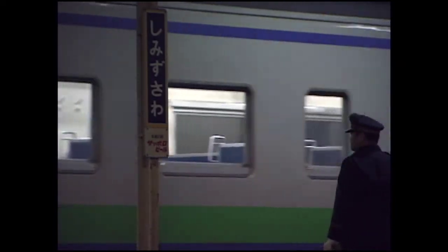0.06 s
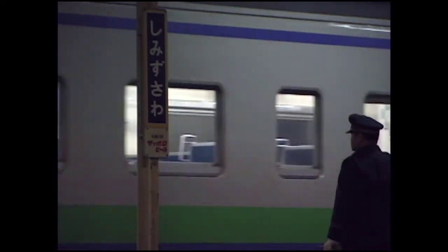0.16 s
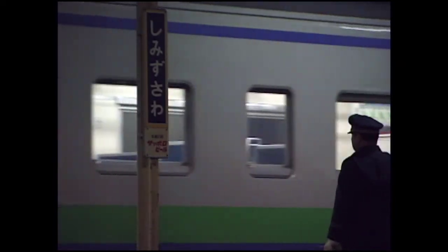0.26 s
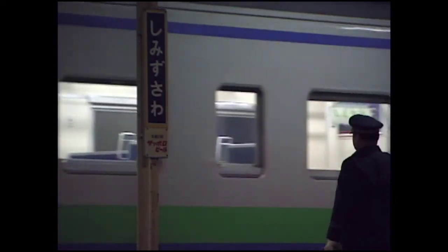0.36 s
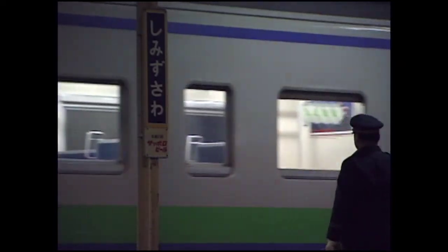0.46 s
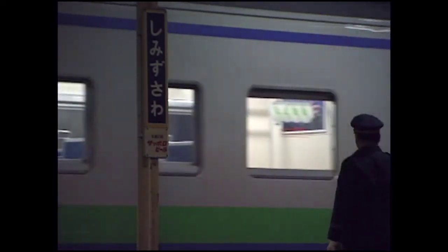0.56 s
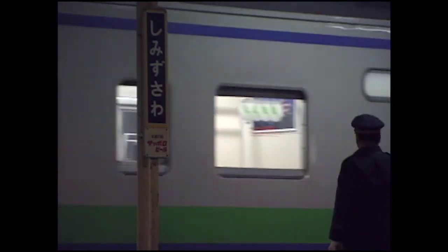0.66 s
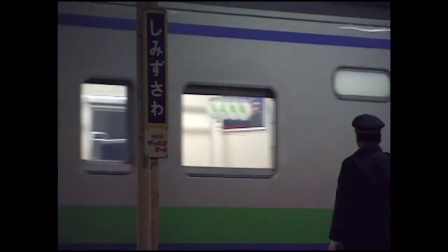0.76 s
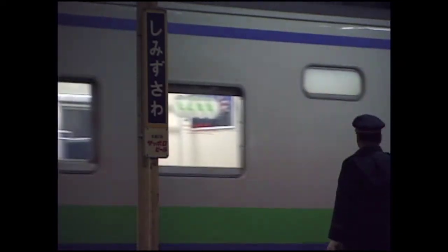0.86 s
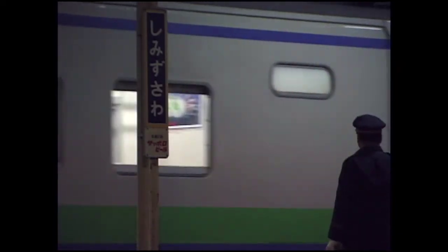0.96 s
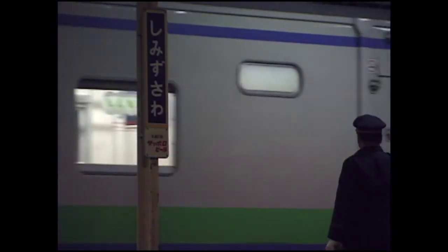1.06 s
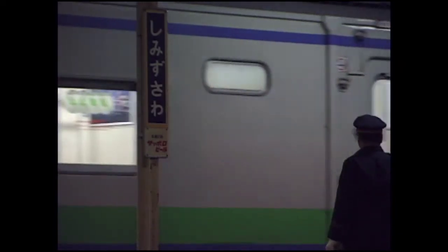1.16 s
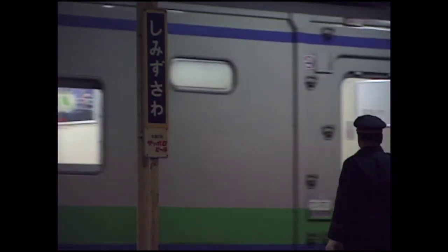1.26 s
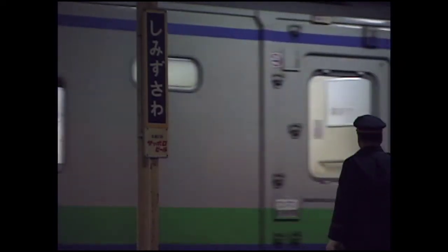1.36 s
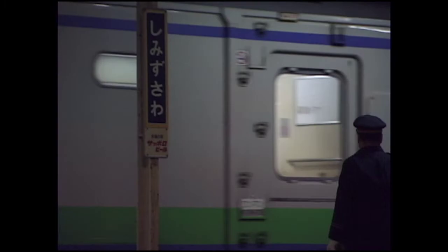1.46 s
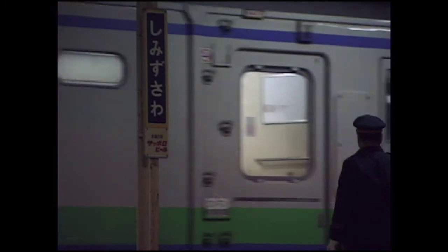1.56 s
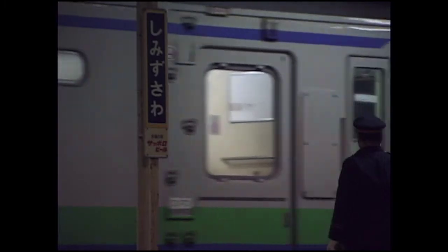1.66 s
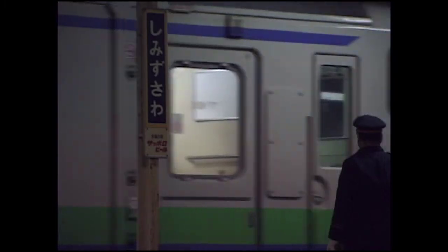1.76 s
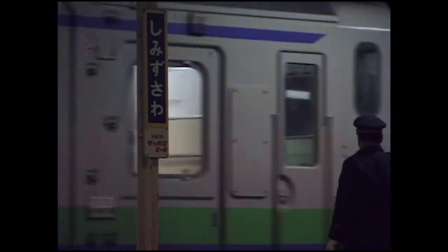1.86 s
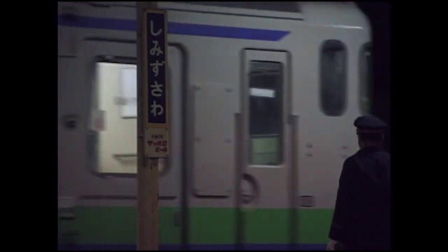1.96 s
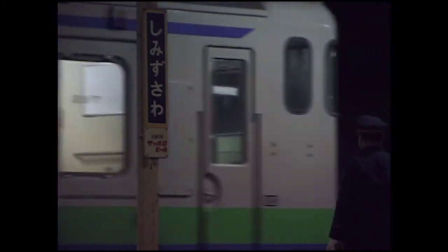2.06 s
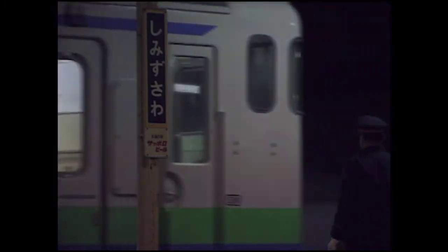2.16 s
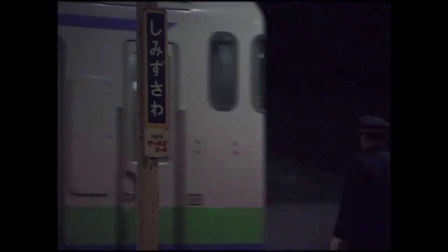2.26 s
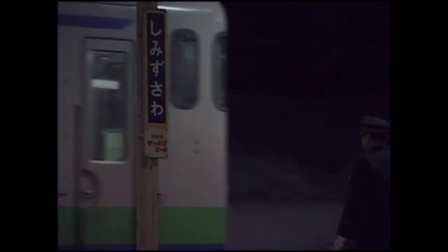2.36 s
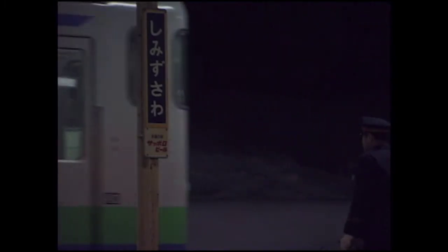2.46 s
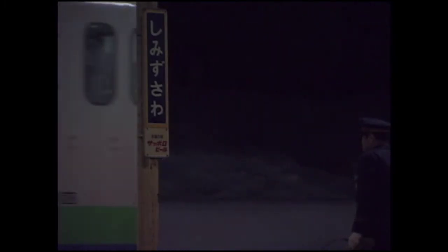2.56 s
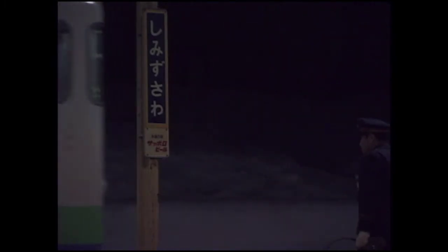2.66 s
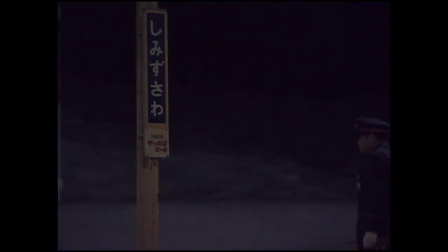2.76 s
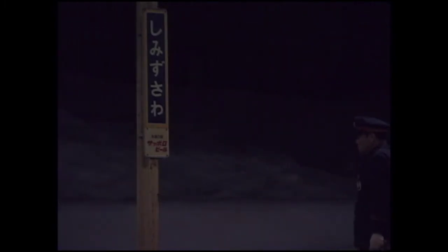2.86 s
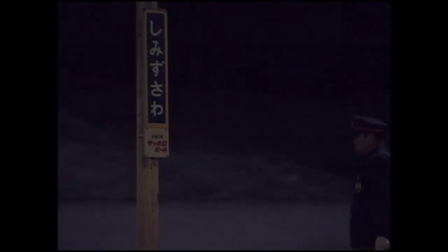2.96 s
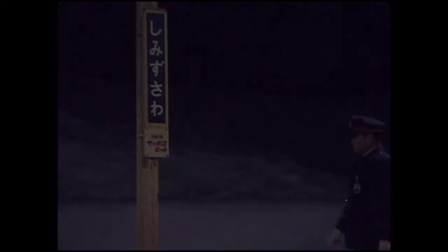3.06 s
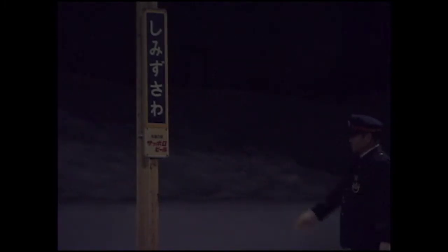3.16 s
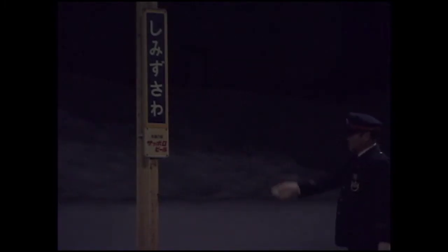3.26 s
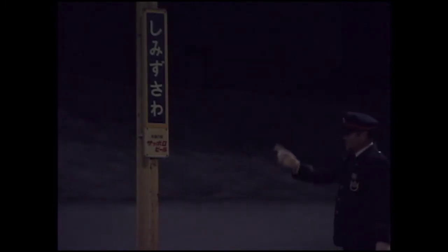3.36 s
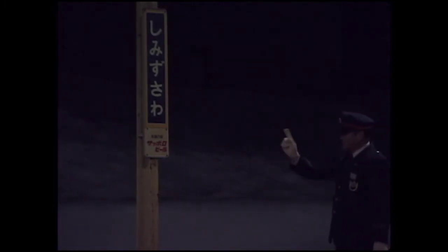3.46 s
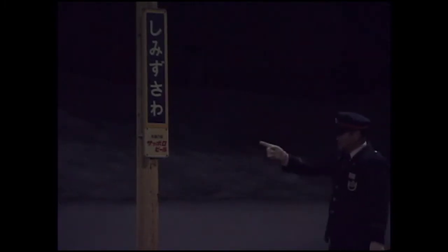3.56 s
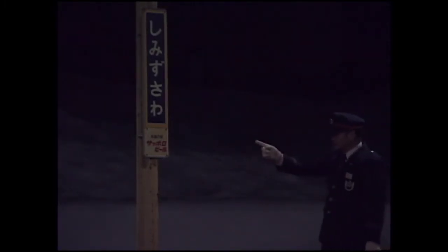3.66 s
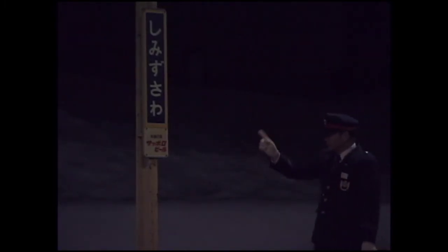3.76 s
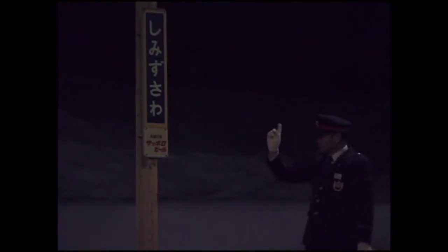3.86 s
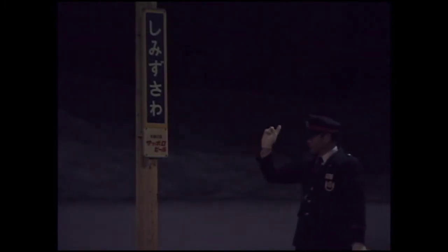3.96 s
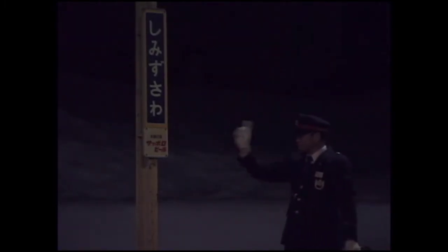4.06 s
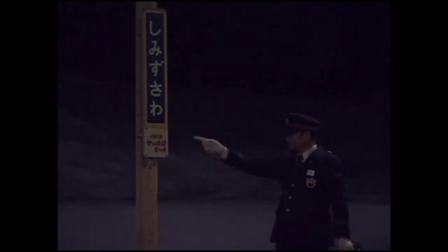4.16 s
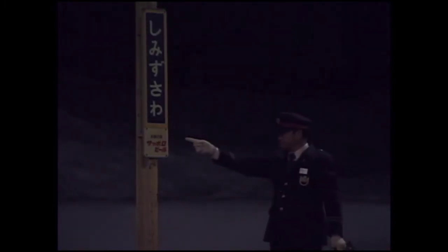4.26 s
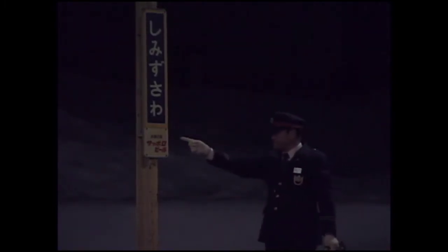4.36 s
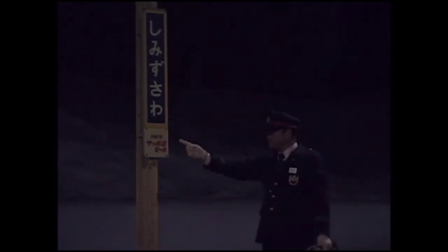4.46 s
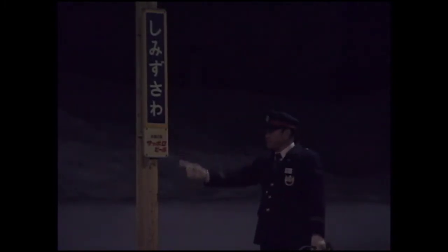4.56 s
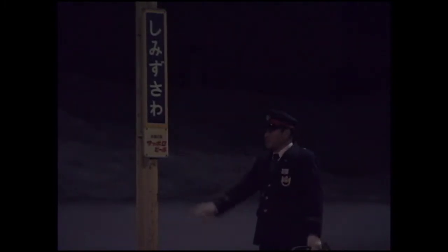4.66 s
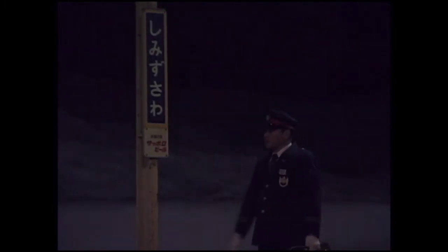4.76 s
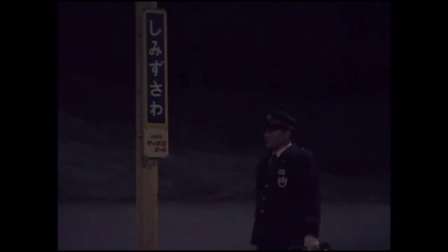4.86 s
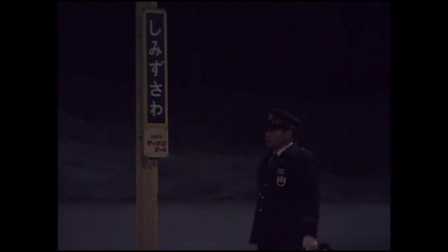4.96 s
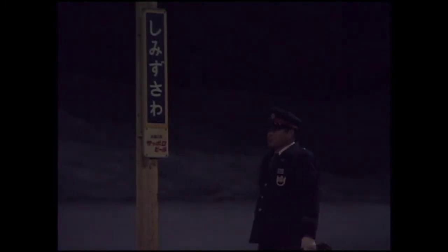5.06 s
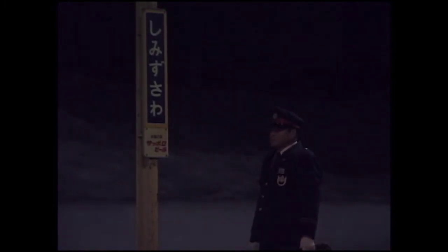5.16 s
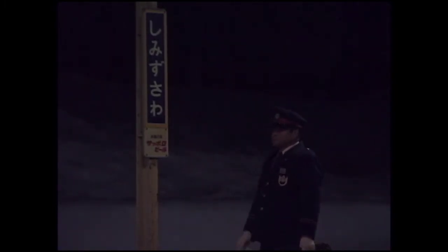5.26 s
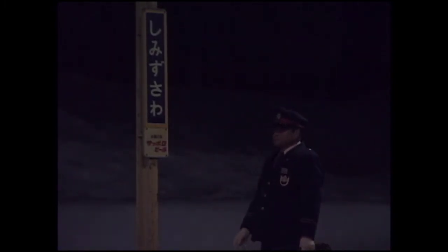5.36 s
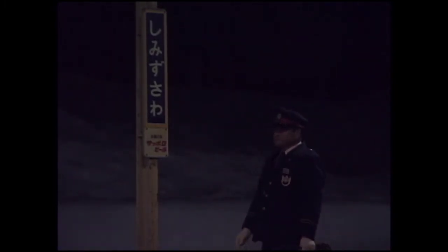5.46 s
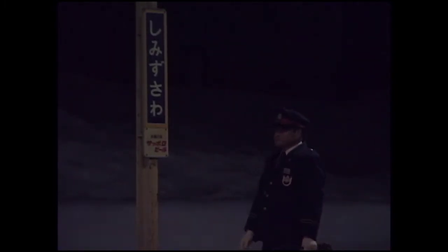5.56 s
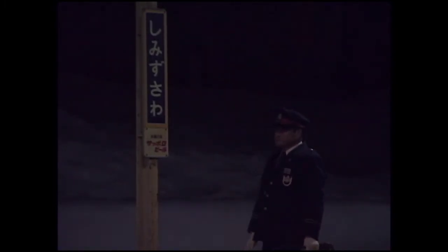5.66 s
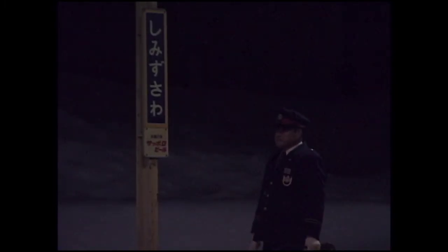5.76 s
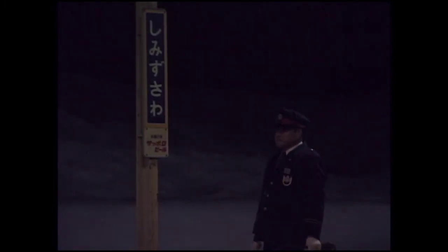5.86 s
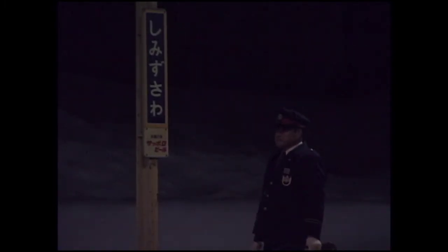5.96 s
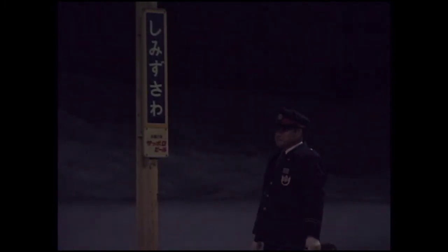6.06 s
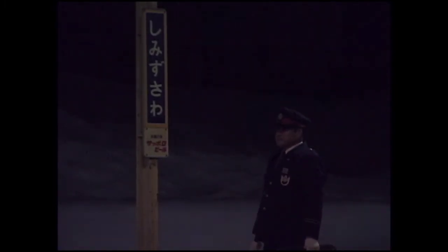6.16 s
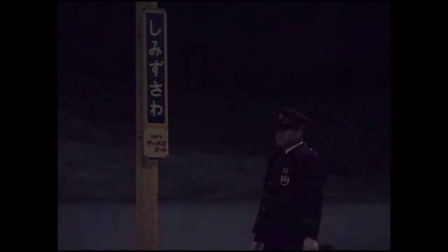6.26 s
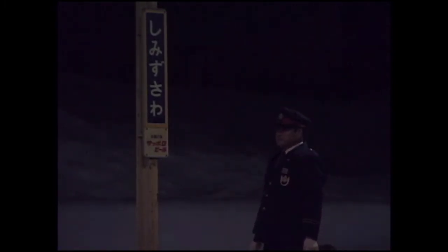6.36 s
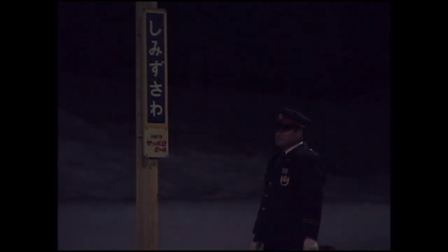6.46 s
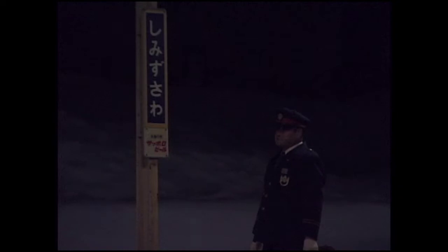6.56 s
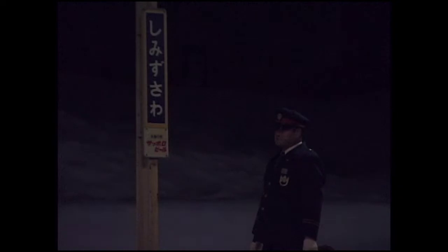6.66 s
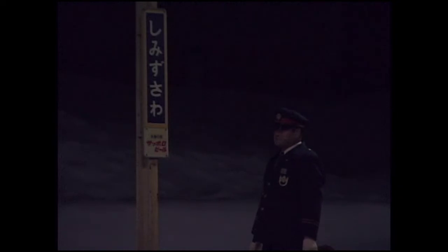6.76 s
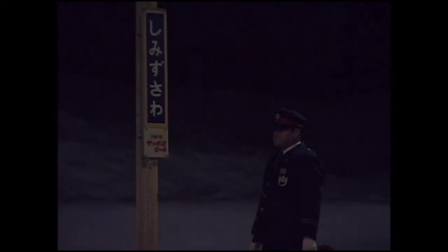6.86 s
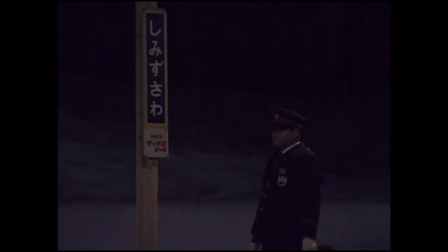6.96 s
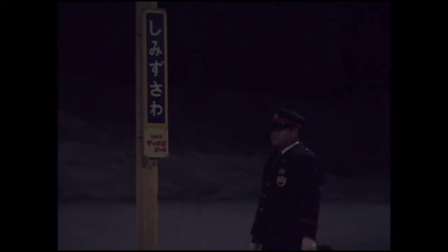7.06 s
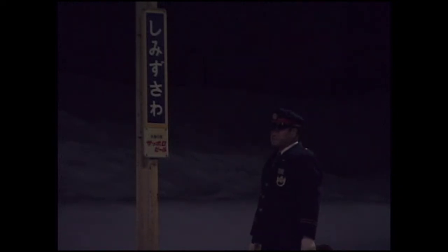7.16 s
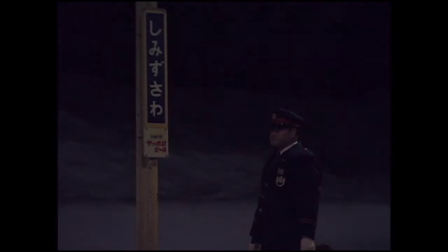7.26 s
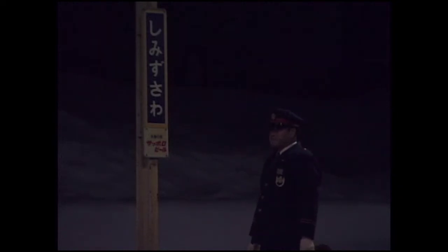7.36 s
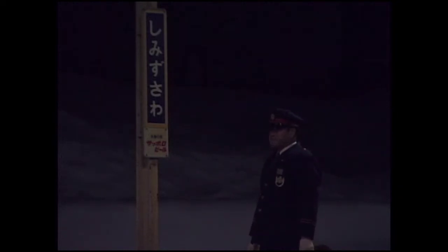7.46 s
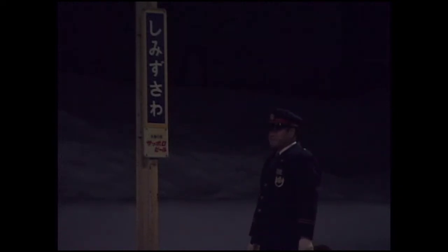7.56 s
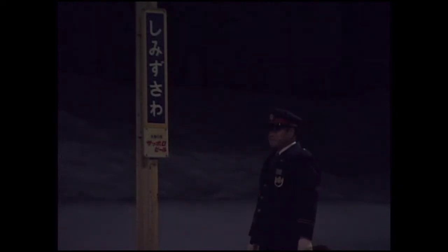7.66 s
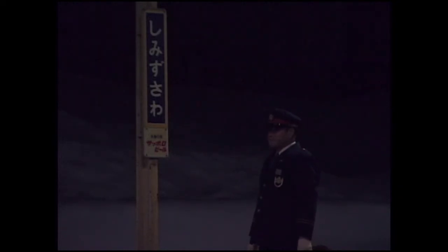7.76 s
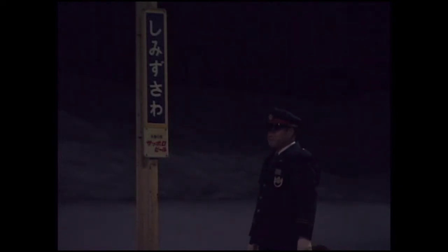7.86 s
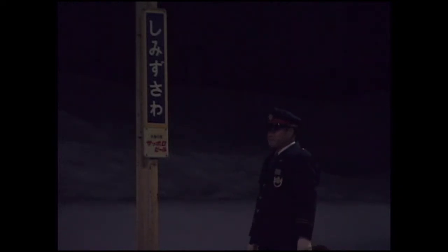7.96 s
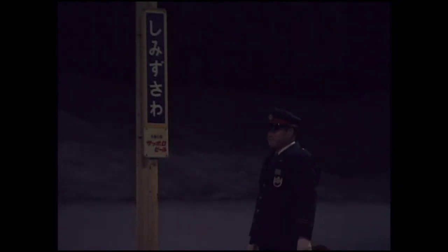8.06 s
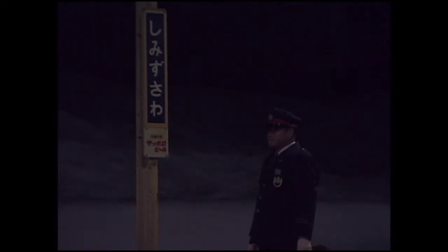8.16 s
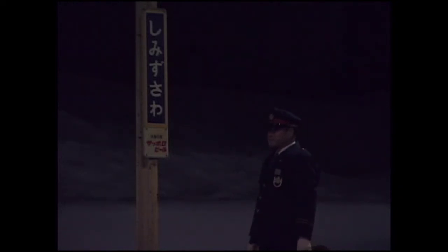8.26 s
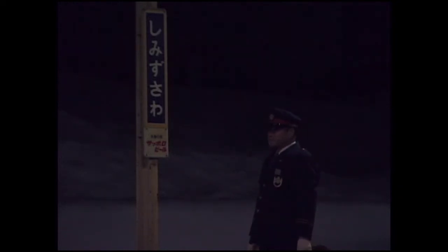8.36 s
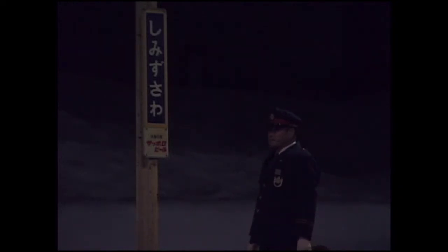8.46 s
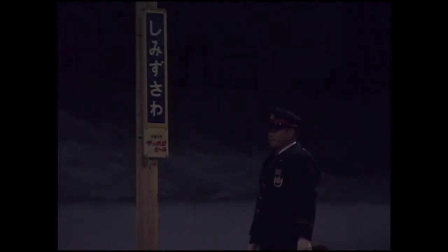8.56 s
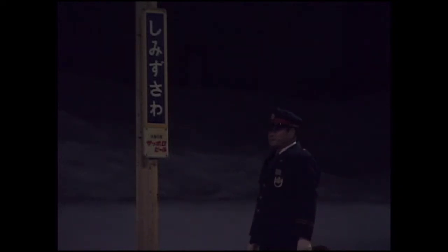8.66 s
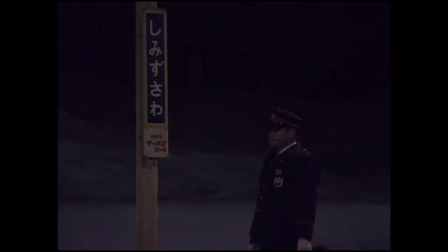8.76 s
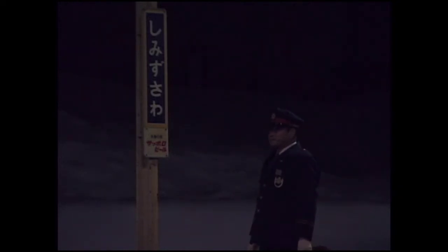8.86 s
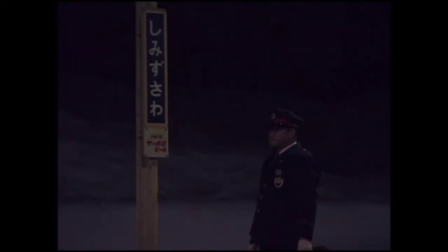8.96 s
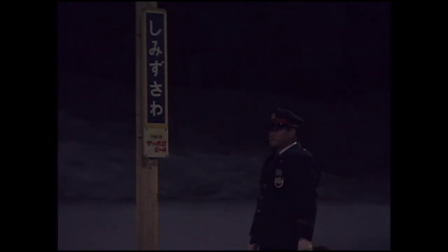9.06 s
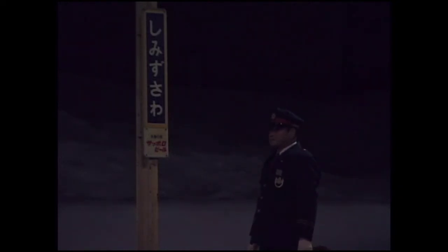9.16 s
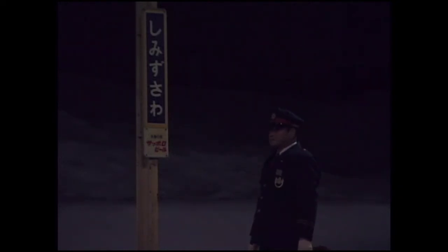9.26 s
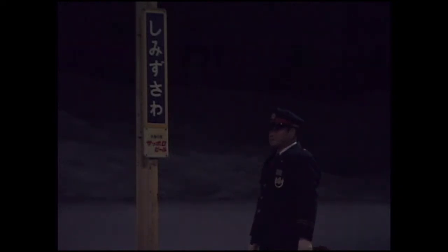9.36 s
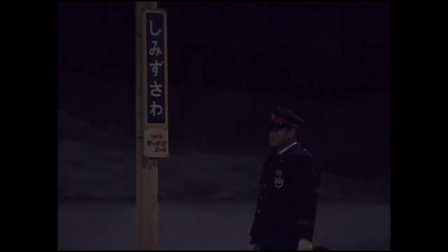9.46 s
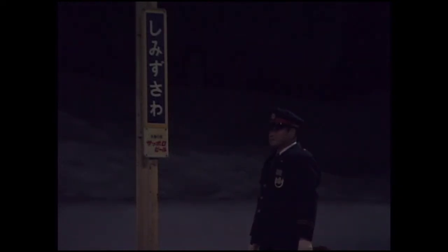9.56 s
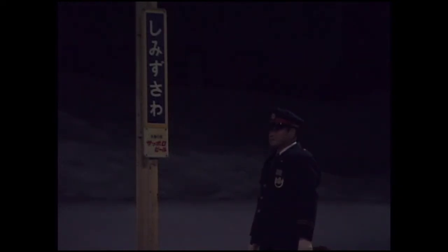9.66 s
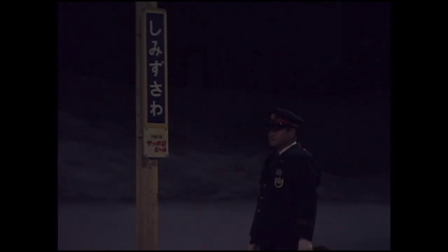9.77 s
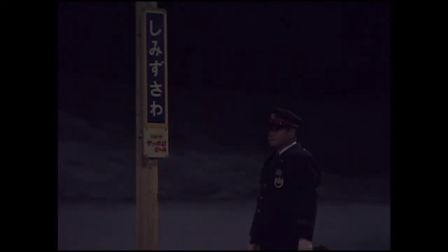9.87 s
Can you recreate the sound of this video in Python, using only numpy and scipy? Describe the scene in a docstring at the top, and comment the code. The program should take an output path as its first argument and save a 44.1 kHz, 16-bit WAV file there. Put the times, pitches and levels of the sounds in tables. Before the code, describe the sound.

From 0 s a diesel railcar is already loud and close to a stereo microphone on an open night platform, nearly centred. Its mid-pitched roar is a rattling, tightly repeating texture with about 78 firing pulses a second, shifting tones, deep exhaust and hard injector clatter. A gear whine rises slightly from about 517 to 537 Hz. Gritty wheel squeaks chirp around 3.4 to 4.5 kHz between 1 and 5 s, and airy hiss swells near 3.4 s. The sound drifts left and the engine pitch sags slowly. From 5 to 7 s it drops rapidly, brightness going first. Distant steel wheels knock over a joint at about 7.3, 7.65, 7.9 and 8.25 s, with short metallic rings. Fainter, duller thumps follow from 8.7 to 9.9 s, with a faint far drone, thin wavering rail whistles near 3.4 kHz, and soft microphone hiss over still night air.

```python
"""Diesel railcar leaving at night

From a platform, a railcar passes close to a two-port microphone and fades away to the left.
Its six-cylinder engine is a noise pattern repeated nearly alike every cycle and pulsed by the firings,
with harmonics of the cycle, a gear whine, squeaks and shaped hiss. Further off, noise bursts ring track
modes as two bogies knock over a rail joint and fainter thumps follow; wavering sines are the thin rails."""
import sys
import numpy as np
from scipy import signal
from scipy.fft import rfft, irfft
from scipy.io import wavfile
from scipy.ndimage import uniform_filter1d, map_coordinates

SR = 44100
rng = np.random.default_rng(int(sys.argv[2]) if len(sys.argv) > 2 else 0)


def pcm_store(signal):
    """Save signal as 16-bit PCM."""
    levels = np.round(np.clip(np.atleast_2d(signal), -1, 1) * 32767)
    wavfile.write(sys.argv[1], SR, levels.astype(np.int16).T)


N = 437472
TIME, FREQ = np.arange(N) / SR, np.maximum(np.fft.rfftfreq(N, 1 / SR), 1)


def undb(db):
    """Decibels to gain."""
    return 10 ** (np.asarray(db) / 20)


def unit(x):
    """Scale to rms 1."""
    return x / np.sqrt(np.mean(x ** 2))


def curves(table):
    """One value per sample for each column of a table of times."""
    seconds, *columns = np.transpose(table)
    return [np.interp(TIME, seconds, column) for column in columns]


def colour(x, points):
    """Give x a spectrum of (Hz, dB) points that falls away beyond its ends; rms 1."""
    hz, db = np.transpose(points)
    skirts = np.minimum(1, np.minimum(FREQ / hz[0], hz[-1] / FREQ)) ** 4
    gain = undb(np.interp(np.log(FREQ), np.log(hz), db))
    return unit(irfft(rfft(x) * skirts * gain, N))


def resonance(f, hz, width):
    """Response of one mode, 1 at its centre."""
    return 1 / (1 + 1j * (f ** 2 - hz ** 2) / (f * width))


def ringing(push, hz, width):
    """A mode kept ringing by a push; rms 1."""
    return unit(irfft(rfft(push) * resonance(FREQ, hz, width) ** 2, N))


def walk(rate, size=8192):
    """Smooth chance that changes about rate times a second; spread 1."""
    f = np.fft.rfftfreq(size, TIME[-1] / size)
    slow = irfft(rfft(rng.standard_normal(size)) * np.exp(-(f / rate) ** 2), size)
    return unit(np.interp(TIME, np.linspace(0, TIME[-1], size), slow))


def swell(s, length_s):
    """A beamed sound rises and falls as its beam sweeps over the platform."""
    return np.exp(-.5 * ((TIME - s) / length_s) ** 2)


def beams(table, push):
    """Resonances set ringing by one push, each swelling in its own time."""
    return sum(undb(db) * swell(s, length_s) * ringing(push, hz, width)
               for hz, width, db, s, length_s in table)


def place(x, pan_db, lag_s):
    """A source on the left is louder there and reaches the right port later."""
    late = map_coordinates(x, [(TIME - lag_s) * SR], order=3, mode="nearest")
    return np.array([x * undb(pan_db / 2), late * undb(-pan_db / 2)])


# four-stroke cycles per second; the Doppler shift lowers them steadily once the engine has gone by
CYCLE_HZ, GONE_BY_S, SAG_HZ_PER_S = 12.972, 1.66, .072
CRANK_JITTER_S = 3.5e-5  # the crankshaft runs a little early and late, which blurs the high harmonics


def crankshaft():
    """Count of engine cycles so far: the running sum of the cycle rate, plus a slow jitter."""
    cycle_hz = CYCLE_HZ - SAG_HZ_PER_S * np.maximum(TIME - GONE_BY_S, 0)
    return np.cumsum(cycle_hz) / SR + CYCLE_HZ * CRANK_JITTER_S * walk(6)


def rattle(turns, change_s, count=3400):
    """A dense rattle that comes round once a cycle; it slowly changes as the car shows other sides."""
    out = np.zeros(N)
    for start in np.arange(0, TIME[-1] + change_s, change_s):
        near = abs(TIME - start) < change_s
        pattern = unit(irfft(np.exp(2j * np.pi * rng.random(count // 2 + 1)), count))
        weight = np.cos(np.pi / 2 * (TIME[near] - start) / change_s)
        position = turns[near] % 1 * count
        out[near] += weight * map_coordinates(pattern, [position], order=3, mode="grid-wrap")
    return out


def engine_drive(turns, share):
    """The rattle that repeats with the engine, mixed with fresh noise."""
    share = np.clip(share, 0, 1)
    return np.sqrt(share) * rattle(turns, 1.1) + np.sqrt(1 - share) * rng.standard_normal(N)


def firings(turns, depth_db, uneven_db, count=6):
    """Each cylinder gives a sharp swell that dies away; alternate cylinders differ in strength."""
    phase = turns * count % 1
    pulse = np.minimum(phase / 0.056, 1) * np.exp(-phase / 0.22)
    return unit(undb(depth_db * pulse + uneven_db * np.cos(np.pi * count * turns)))


def machinery(turns, share, spectrum, depth_db, uneven_db, flutter_db):
    """The engine's rattle, pulsed by the firings and coloured by the part that radiates it."""
    pulsed = engine_drive(turns, share) * firings(turns, depth_db, uneven_db)
    return colour(pulsed, spectrum) * undb(flutter_db * walk(14.0))


# Low note of the exhaust. Each row: pitch in Hz, level in dB within the spectrum.
EXHAUST_SPECTRUM = [(30, -47), (70, -43), (120, -29.5), (180, -17.5), (250, -7.5), (320, -7), (400, -1),
                    (520, 1.5), (620, 1.5), (800, -33)]
# the deep exhaust carries further: its level beside the car, and the dB it loses for each dB the block loses
EXHAUST_DB, EXHAUST_FADE = -34, 0.67


def exhaust(turns, share, block_db):
    """Deep noise pulsed gently by the firings; it fades less with distance than the block."""
    level_db = EXHAUST_DB + EXHAUST_FADE * (block_db - block_db.max())
    sound = machinery(turns, 0.69 * share, EXHAUST_SPECTRUM, depth_db=2.5, uneven_db=0.3, flutter_db=1.0)
    return sound * undb(level_db)


# Roar of the engine block. Each row: pitch in Hz, level in dB within the spectrum.
BLOCK_SPECTRUM = [(400, -42), (540, -10.5), (620, -2), (700, -3), (800, 2.5), (900, -1.5), (1020, -2),
                  (1200, -7.5), (1400, -8), (1800, -11.5)]


def engine_block(turns, share, block_db):
    """Middle-pitched roar, pulsed by the firings; it flutters more as the repeating share drops."""
    sound = machinery(turns, 0.55 * share, BLOCK_SPECTRUM, depth_db=4.0, uneven_db=0.5,
                      flutter_db=.7 * (1 - share))
    return sound * undb(block_db - 1.5)


# Engine tones that stand out from the roar. Each row: multiple of the cycle rate, level in dB before the
# fade with the block, second when loudest, half length in seconds.
ENGINE_ORDERS = [(14, -62, 1.5, 3), (16, -60, 3, 2.2), (18, -59, 4, .6), (20, -50, .6, .9),
                 (20, -56, 4, 1.1), (24, -54, .6, .8), (26, -53, 2.5, 1.3), (26, -55, 5.8, .8),
                 (30, -48, 1.1, .6), (31, -47.5, 3.2, 2.4), (33, -48, 2.7, .4), (39, -47, 1.5, 1.8),
                 (47, -43.5, 2.3, 1.6), (48, -42, 2, .4), (48, -43.5, 5.8, .5), (50, -38.5, 2.7, .65),
                 (53, -42, 4.8, 1.1), (55, -39.5, 2.5, .45), (55, -45, 5.8, .45), (57, -37, .9, .6),
                 (57, -44, 4.1, 1.1), (58, -41, .4, .5), (60, -39, 1.5, .55), (61, -40.5, .3, .55),
                 (61, -42.5, 3.1, .7), (62, -36.5, .5, .6), (62, -36, 3.3, .6), (62, -42, 4.8, .5),
                 (63, -39.5, .3, .4), (63, -38.5, 3.7, .5), (64, -42, 2.8, 1), (68, -41, .8, .8),
                 (69, -43.5, 3, 1.2), (72, -36.5, .25, .45), (75, -39.5, 1.3, .3), (76, -42, 4.8, .7),
                 (77, -41, 3.6, 1.1), (78, -41, .5, .55), (86, -42.5, 5.2, .5), (96, -40.5, 1.3, .5),
                 (108, -42, 1.4, .5), (129, -42, 3.5, .5), (133, -40, 1.6, 1.5), (133, -41.5, 4.9, .5),
                 (135, -39.5, .2, .45), (137, -39, .8, .6), (137, -44, 4, .8), (139, -38, 1, .55),
                 (139, -41, 4.95, .45), (145, -41, 1, .5)]
TONES_FADE_DB = -32  # the tones sink with the block once it is below this level


def engine_tones(turns, block_db, scatter_per_order=.007, most_scatter=.42):
    """Harmonics of the cycle, each beamed in its own time; shifting reflections make higher ones waver."""
    tones = 0
    for order, db, s, length_s in ENGINE_ORDERS:
        phase = 2 * np.pi * (order * turns + rng.random())
        scatter = min(scatter_per_order * order, most_scatter)
        wavering = np.sin(phase + scatter * walk(3)) * (1 + scatter * walk(3))
        tone = wavering * np.sqrt(2 / (1 + scatter ** 2))
        tones = tones + undb(db) * swell(s, length_s) * tone
    return tones * undb(np.minimum(block_db - TONES_FADE_DB, 0))


# The final drive whines upward as the car gathers speed, until the Doppler shift holds it.
# Each row: time in seconds, pitch in Hz, level in dB.
GEAR_PATH = [(0, 517, -43), (.6, 525, -43), (1.4, 532, -46), (2.4, 537, -46), (4, 537, -42.5),
             (4.9, 536, -42), (5.7, 534, -50), (7, 534, -66), (8, 534, -80)]


def gear_whine(waver_hz=1.2, flutter_db=2.2):
    """Meshing teeth sing one wavering note that follows the road speed."""
    hz, db = curves(GEAR_PATH)
    phase = 2 * np.pi * np.cumsum(hz + waver_hz * walk(8)) / SR
    return undb(db + flutter_db * walk(5)) * np.sqrt(2) * np.sin(phase)


# Body panels that drone as the car goes by the platform. Each row: pitch in Hz, width in Hz, level in dB,
# second when loudest, half length in seconds.
PANEL_MODES = [(248, 110, -62.5, 6.1, 0.98), (384, 50, -43, 3.97, 0.52), (636, 180, -32, 2.5, 0.33),
               (564, 140, -36, 3.9, .4), (974, 210, -33.5, 4.87, 0.77), (1800, 46, -35, 0.15, 0.62),
               (1753, 63, -40, 3.1, 0.99), (1723, 75, -34, 4.96, 0.48)]


def body_panels(turns, share):
    """Panel resonances driven mostly by the engine's rattle, each swelling in its own time."""
    return beams(PANEL_MODES, engine_drive(turns, .85 * share))


# Clatter of the injectors. Each row: pitch in Hz, level in dB within the spectrum.
CLATTER_SPECTRUM = [(1000, -2.5), (1350, -3), (1550, -1.5), (1770, 2), (2000, -2), (2300, -6.5),
                    (2900, -11.5), (3150, -12), (3420, -13), (3750, -19.5), (4500, -61)]


def injector_clatter(turns, share):
    """Hard upper-middle noise, pulsed most deeply while the engine's repeating share is high."""
    return machinery(turns, 0.57 * share, CLATTER_SPECTRUM, depth_db=6.1 * share, uneven_db=-0.36,
                     flutter_db=0.55)


# Bright ticks of the injectors. Each row: pitch in Hz, level in dB within the spectrum.
TICK_SPECTRUM = [(2500, -2.5), (3000, -3.5), (3400, 4.5), (3750, 1), (4250, 0), (4750, -9), (5600, -14.5),
                 (8000, -54)]


def injector_ticks(turns, share):
    """Brighter pulsed noise under the clatter, most of it fresh at each cycle."""
    return undb(-11.5) * machinery(turns, 0.11 * share, TICK_SPECTRUM, depth_db=7.4 * share,
                                   uneven_db=0.9, flutter_db=1.3)


# Wheel modes that grit sets chirping. Each row: pitch in Hz, width in Hz, level in dB against the clatter
# before the flutter and the fade with the engine's share.
WHEEL_MODES = [(3430, 130, -19), (4230, 420, -20), (6450, 560, -39)]
# The clearest stick-slip squeaks from the wheels. Each row: start in seconds, pitch in Hz, level in dB
# against the clatter before that fade.
CLEAR_SQUEAKS = [(1.190, 4050, -11), (1.663, 3350, -6), (1.819, 3420, -5), (2.695, 3570, -11),
                 (3.144, 4520, -14), (3.349, 3445, -5), (4.054, 4300, -8), (4.536, 3430, -2),
                 (4.616, 3450, -4), (4.928, 3500, -4), (5.127, 4250, -8)]
# fainter squeaks: how many a second, level against the wheel mode set off, stray from its pitch (share)
SQUEAKS_PER_S, SQUEAK_DB, SQUEAK_DETUNE = 22, 3, .06


def squeaks(rise_s=0.0066, width_hz=300, size=4400):
    """Stick-slip chirps, each a rough ring that grows and dies; faint ones fall at random near wheel modes."""
    t, f = TIME[:size], np.maximum(np.fft.rfftfreq(size, 1 / SR), 1)
    slip = (t / rise_s / 2) ** 2 * np.exp(2 - t / rise_s)
    faint = []
    for when, which, detune in rng.random((int(SQUEAKS_PER_S * N / SR), 3)):
        hz, _, db = WHEEL_MODES[int(which * len(WHEEL_MODES))]
        pitch_hz = hz * (1 + SQUEAK_DETUNE * (2 * detune - 1))
        faint.append((when * TIME[-1], pitch_hz, db + SQUEAK_DB))
    out = np.zeros(N + size)
    for s, hz, db in [*CLEAR_SQUEAKS, *faint]:
        noise = rng.standard_normal(size)
        ring = slip * irfft(rfft(noise) * resonance(f, hz, width_hz) ** 2, size)
        start = int(s * SR)
        out[start:start + size] += undb(db) * ring * slip.std() / ring.std()
    return out[:N]


def wheel_chirps(share):
    """Noise keeps the wheel modes ringing unsteadily, with squeaks on top; all fade with the share."""
    chirps = squeaks()
    for hz, width, db in WHEEL_MODES:
        fluttering = ringing(rng.standard_normal(N), hz, width) * undb(5 * walk(50))
        chirps = chirps + undb(db) * unit(fluttering)
    return (share / share.max()) ** 2 * chirps


# A close reflection sweeps a notch through the hiss. Each row: time in seconds, extra delay in seconds.
REFLECTION_DELAY = [(0, .000138), (1.6, .00013), (3.1, .000102), (4.1, .000136), (6, .00015)]


def reflected(x, gain=.36):
    """Add the close reflection, whose delay changes as the car moves; levelled to a running rms of 1."""
    delay_s = curves(REFLECTION_DELAY)[0]
    both = x + gain * map_coordinates(x, [(TIME - delay_s) * SR], order=3, mode="nearest")
    return both / np.sqrt(uniform_filter1d(both ** 2, size=22050))


# Hiss of the passing car. Each row: pitch in Hz, level in dB within the spectrum.
HISS_SPECTRUM = [(3800, -4), (5000, 1), (6300, 6), (7000, 1), (8200, 3), (9300, -2), (11000, -7.5)]
# Finest top of that hiss. Each row: pitch in Hz, level in dB within the spectrum.
TOP_SPECTRUM = [(8500, -7), (10000, -5.5), (12000, -6), (14200, -13)]
# Treble as the car leaves. Each row: time in seconds, hiss in dB and finest top in dB, before small trims.
TREBLE_LEVELS = [(0.0, -59.5, -61), (1.94, -55, -59), (3.39, -48, -58), (4.16, -51.5, -74),
                 (5.73, -54.5, -75), (6.01, -63, -75), (6.25, -64.5, -71), (6.88, -68.5, -82),
                 (8.4, -78, -93)]
# A narrow band of the hiss swells briefly. Each row: pitch in Hz, width in Hz, level in dB,
# second when loudest, half length in seconds.
HISS_SWELL = [(8200, 1300, -55.5, 1.45, 0.45)]


def engine_hiss(turns, share):
    """Beamed treble noise pulsed by the firings, notched by a reflection; it dies first."""
    hiss_db, top_db = curves(TREBLE_LEVELS)
    hiss = machinery(turns, .15 * share, HISS_SPECTRUM, depth_db=8 * share, uneven_db=.3, flutter_db=.9)
    top = machinery(turns, .15 * share, TOP_SPECTRUM, depth_db=5 * share, uneven_db=1, flutter_db=.9)
    band_push = rng.standard_normal(N) * firings(turns, depth_db=8, uneven_db=1)
    return (reflected(hiss) * undb(hiss_db - 0.76) + reflected(top) * undb(top_db + 2.5)
            + beams(HISS_SWELL, band_push))


# The still night around the platform. Each row: pitch in Hz, level in dB within the spectrum.
NIGHT_SPECTRUM = [(25, -13), (60, 2), (85, 4), (130, -5), (300, -1), (1000, -4), (3000, -8)]


def still_night(level_db=-77):
    """Steady low-weighted noise, the same at both ports."""
    return undb(level_db) * colour(rng.standard_normal(N), NIGHT_SPECTRUM)


# Each microphone port's own hiss. Each row: pitch in Hz, level in dB within the spectrum.
PORT_SPECTRUM = [(1500, 1), (4000, 4), (6000, -4.5), (9000, -7.5), (14000, -8)]


def port_hiss(level_db=-67.5):
    """Steady noise drawn apart for each port."""
    noises = rng.standard_normal((2, N))
    return undb(level_db) * np.array([colour(noise, PORT_SPECTRUM) for noise in noises])


# What wheel and track ring with. Each row: pitch in Hz, width in Hz, level in dB before the band limits.
TRACK_MODES = [(225, 130, -15.5), (368, 66, -5), (449, 76, -2), (563, 97, 0), (692, 100, 4.5),
               (830, 147, 2), (1030, 130, -3), (1220, 210, -10), (1410, 95, -12), (1880, 260, -18),
               (2080, 400, -37), (2600, 310, -20), (3400, 700, -49)]
# Wheels striking joints, further off. Each row: start in seconds, level in dB before a 4.5 dB cut,
# decay in seconds, brightness in dB per octave, crack in dB, the wheel's own ring in Hz, its level in dB
# against the knock.
WHEEL_STRIKES = [(7.273, -26.5, 0.0083, -4.5, -12, 604, -9), (7.644, -18, 0.012, -3.5, -18, 2070, -21),
                 (7.684, -36, 0.018, 2, -18, 560, -12), (7.889, -30, 0.01, -1, -23, 500, -10),
                 (7.908, -30, 0.033, -1.5, -14, 1230, -12), (8.262, -19.5, 0.027, -1.5, -22, 1220, -16.5),
                 (8.345, -39, 0.022, 2, -20, 824, -12), (8.695, -43, 0.06, -9.5, -14, 477, 0),
                 (8.797, -46.5, .018, -15, -15, 445, 6.5), (8.857, -47, 0.015, -13, -16, 512, 4),
                 (9.14, -46.5, 0.018, -4, -14, 518, -1), (9.231, -51, 0.014, -12, -18, 450, 5),
                 (9.657, -46.5, .025, 0, -14, 744, 4), (9.769, -42.5, 0.022, -19, -16, 469, 3),
                 (9.86, -47, 0.01, -6.5, -16, 490, -4)]
CRACK_HZ, CRACK_WIDTH_HZ = 1700, 1360  # the broad crack of steel on steel, each of three passes
KNOCK_RISE_S, DULL_RISE_S = 0.010, 0.0003  # time to full force, its growth per dB per octave of dullness
BLOW_DB = 18  # the landing blow against the chatter


def wheel_knocks(tail_db=-21, tail_s=0.3, wheel_s=0.02, low_hz=260, high_hz=3800, size=22050):
    """A wheel chatters over the gap and lands with a blow that rings it and track; a faint tail follows."""
    t, f = TIME[:size], np.maximum(np.fft.rfftfreq(size, 1 / SR), 1)
    # neighbouring modes answer in opposite sense
    track = sum((-1) ** k * undb(db) * resonance(f, hz, width)
                for k, (hz, width, db) in enumerate(TRACK_MODES))
    track = track / (1 + low_hz / (1j * f)) ** 3 / (1 + 1j * f / high_hz) ** 3
    crack = resonance(f, CRACK_HZ, CRACK_WIDTH_HZ) ** 3
    out = np.zeros(N + size)
    for s, db, decay_s, tilt_db, crack_db, wheel_hz, wheel_db in WHEEL_STRIKES:
        rise_s = KNOCK_RISE_S + DULL_RISE_S * max(-tilt_db, 0)
        onset, after = np.sqrt(np.minimum(t / rise_s, 1)), np.maximum(t - rise_s, 0)
        envelope = onset * (np.exp(-after / decay_s) + undb(tail_db) * np.exp(-t / tail_s))
        force = envelope * rng.standard_normal((2, size))
        force[:, int(rise_s * SR)] += undb(BLOW_DB)
        tilt = undb(tilt_db * np.log2(np.clip(f, 450, 3000) / 700))
        spectrum = rfft(force[0]) * track + rfft(force[1]) * undb(crack_db) * crack
        ring = irfft(spectrum * tilt, size)
        loudest = np.sqrt(uniform_filter1d(ring ** 2, size=600).max())
        wheel_tone = np.sqrt(2) * np.sin(2 * np.pi * wheel_hz * t)
        wheel = undb(wheel_db) * onset * np.exp(-after / wheel_s) * wheel_tone
        start = int(s * SR)
        out[start:start + size] += undb(db - 4.5) * (ring / loudest + wheel)
    return place(out[:N], pan_db=3.6, lag_s=.0001)


# Few low notes of the far car's exhaust. Each row: pitch in Hz, width in Hz, level in dB,
# second when loudest, half length in seconds.
DRONE_NOTES = [(150, 14, -82, 9, 1.2), (258, 6, -68, 9, 1.5), (450, 70, -52, 7.95, .3)]


def far_drone():
    """The exhaust of the far car drones on: noise rings narrow low resonances."""
    return beams(DRONE_NOTES, rng.standard_normal(N))


# Thin whistles of the rails. Each row: pitch in Hz, level in dB, second when loudest, half length in seconds.
RAIL_WHISTLES = [(3445, -73.5, 8.75, 0.45), (3391, -74, 9.55, 0.42), (3951, -83, 9.1, 0.9),
                 (4648, -85, 8.1, .5), (4963, -86, 8.6, 1.2), (5060, -80.5, 9.05, .4),
                 (5561, -87, 8.7, 1.1)]


def singing_rails(waver_hz=2, flutter_db=1.3):
    """The rolling wheels keep a few high rail modes whistling, heard once the engine is far."""
    song = 0
    for hz, db, s, length_s in RAIL_WHISTLES:
        phase = 2 * np.pi * np.cumsum(hz + waver_hz * walk(28)) / SR
        level = undb(db + flutter_db * walk(10)) * swell(s, length_s)
        song = song + level * np.sqrt(2) * np.sin(phase)
    return place(song, pan_db=2, lag_s=.00003)


# How far the sound repeats with the engine; the rest is rolling noise. Each row: time in seconds,
# share 0-1 before each part's own factor.
REPEATING_SHARE = [(0, 0.8), (6.1, 0.8), (7.2, 0.4), (8.5, 0.2)]
# The car going away from the platform. Each row: time in seconds, roar of the engine block in dB,
# injector clatter in dB, before small trims.
PASSING_LEVELS = [(0.0, -23, -23.5), (0.41, -23.5, -23), (0.72, -26, -23.5), (1.05, -24.5, -22.5),
                  (2.48, -25, -26), (2.65, -25.5, -25), (3.84, -25, -28.5), (5.03, -28, -32),
                  (5.47, -29.5, -32), (6.32, -31.5, -41.5), (6.55, -34, -45.5), (6.88, -40, -46.5),
                  (7.87, -46, -51.5), (8.54, -54, -58), (9.2, -53.5, -63), (9.92, -54, -62.5)]
# Where the car is heard. Each row: time in seconds, left minus right in dB before each part's own factor.
CAR_BEARING = [(0.0, 0.5), (4.79, 4.5), (5.53, 5), (8.6, 4.5)]
# the right port hears the car later the further left it is: greatest lag before each part's factor, and
# how sharply it grows
LAG_S, LAG_POWER = .00019, 1.05


def railcar():
    """Exhaust, block and injectors all follow one crankshaft, and the car moves left as it leaves."""
    turns = crankshaft()
    block_db, clatter_db = curves(PASSING_LEVELS)
    (share,), (pan_db,) = curves(REPEATING_SHARE), curves(CAR_BEARING)
    lag_s = LAG_S * abs(pan_db / pan_db.max()) ** LAG_POWER
    low = exhaust(turns, share, block_db) + far_drone()
    middle = engine_block(turns, share, block_db) + engine_tones(turns, block_db)
    middle = middle + gear_whine() + body_panels(turns, share)
    high = injector_clatter(turns, share) + injector_ticks(turns, share) + wheel_chirps(share)
    high = high * undb(clatter_db - 0.36)
    # the microphone housing shades the far port more, and delays it less, as the pitch rises;
    # the hiss stays near the middle
    return (place(low, .5 * pan_db, 1.64 * lag_s)
            + place(middle, 1.14 * pan_db, lag_s)
            + place(high, 1.68 * pan_db, .5 * lag_s)
            + place(engine_hiss(turns, share), 0.13 * pan_db, 0))


def scene():
    """The railcar, the quiet night, the hiss of the two ports, the wheels on the joints and the rails."""
    return railcar() + still_night() + port_hiss() + wheel_knocks() + singing_rails()


def record(dry, cut_hz=14400):
    """The recorder cuts the top steeply."""
    steep = signal.ellip(10, .2, 80, cut_hz, fs=SR, output="sos")
    return signal.sosfilt(steep, dry)


dry = scene()
out = record(dry)
pcm_store(out)
```